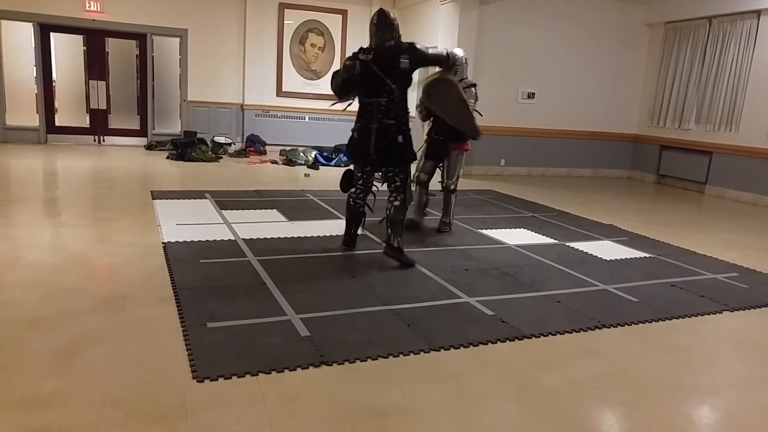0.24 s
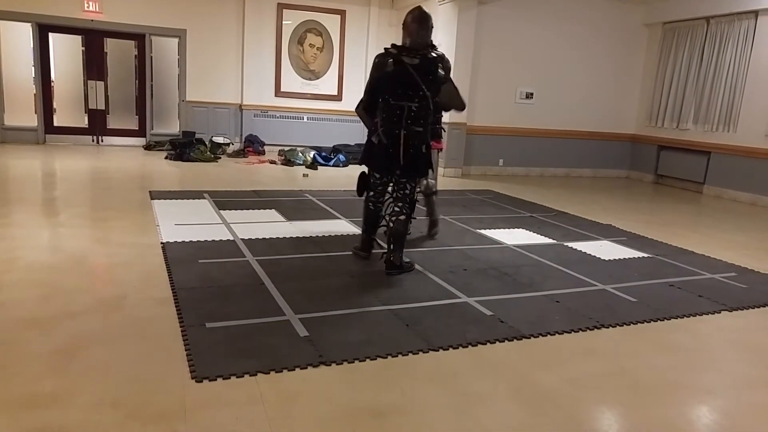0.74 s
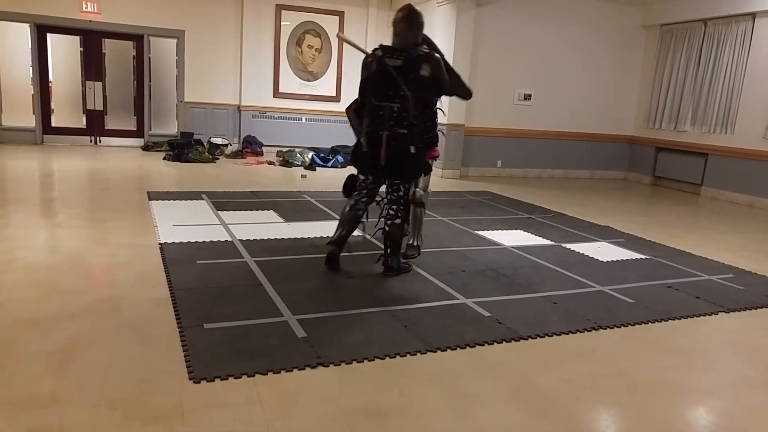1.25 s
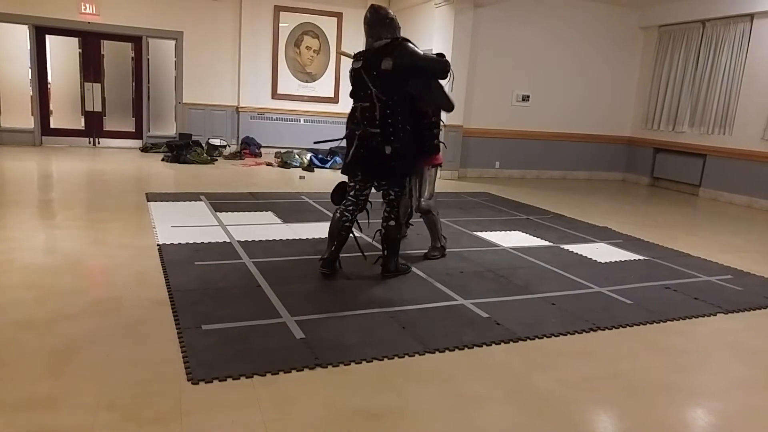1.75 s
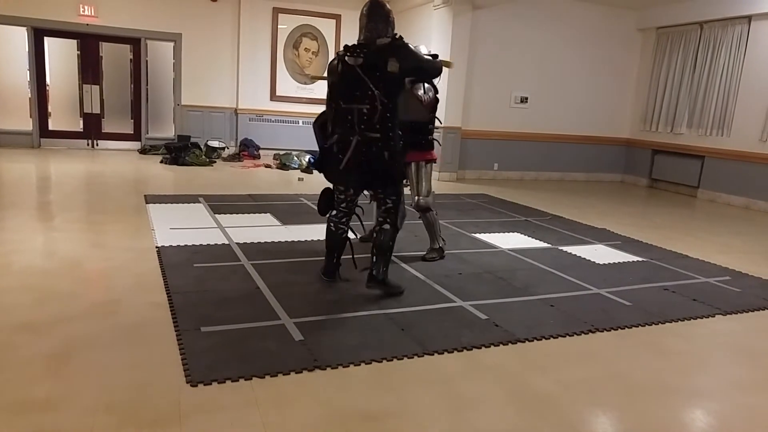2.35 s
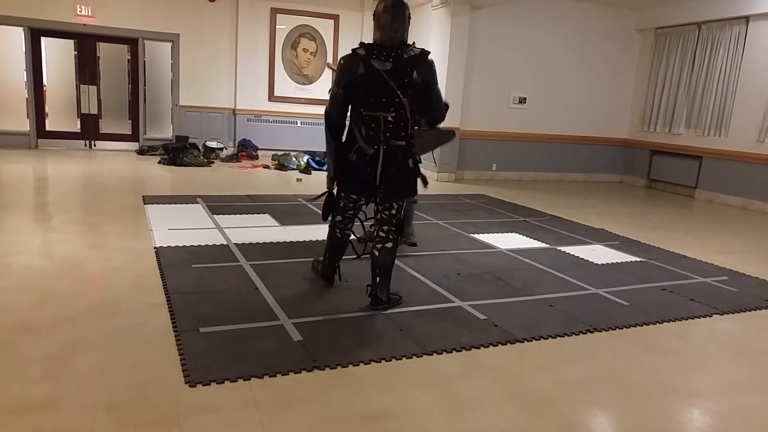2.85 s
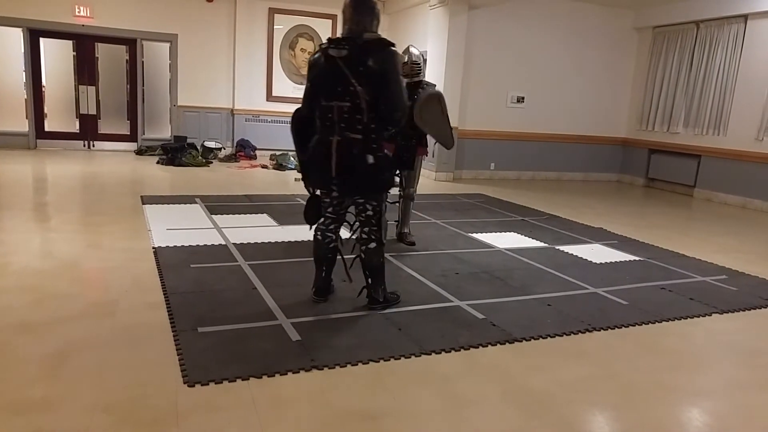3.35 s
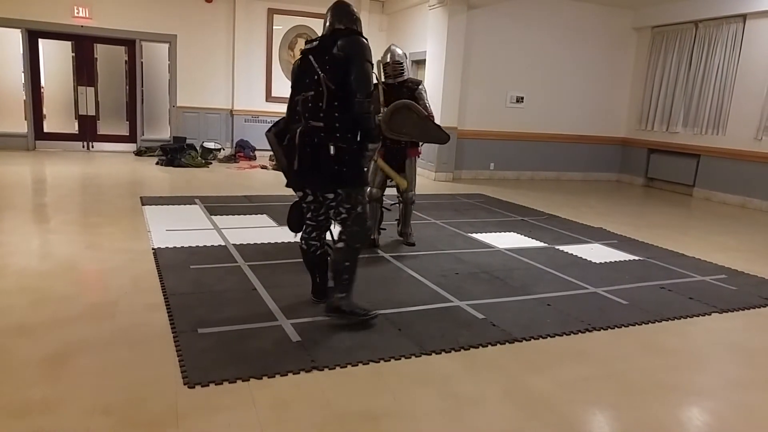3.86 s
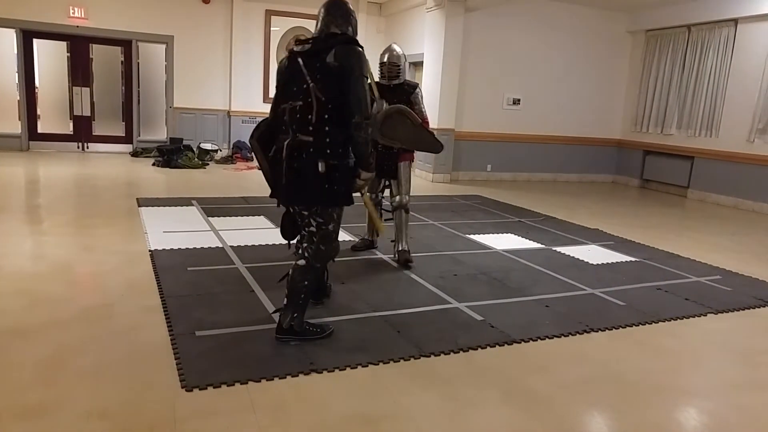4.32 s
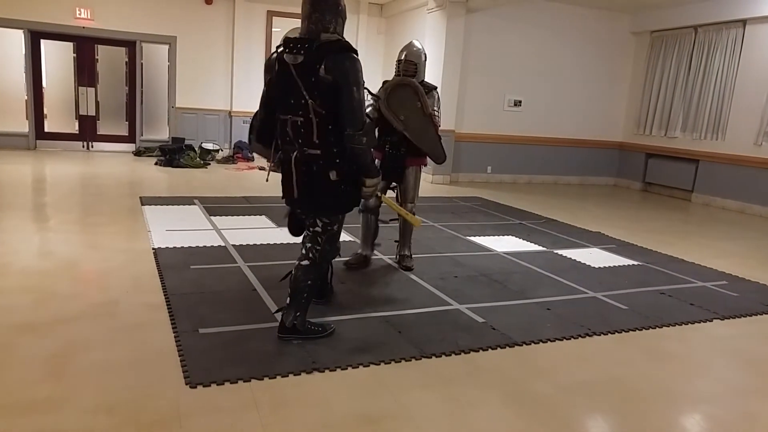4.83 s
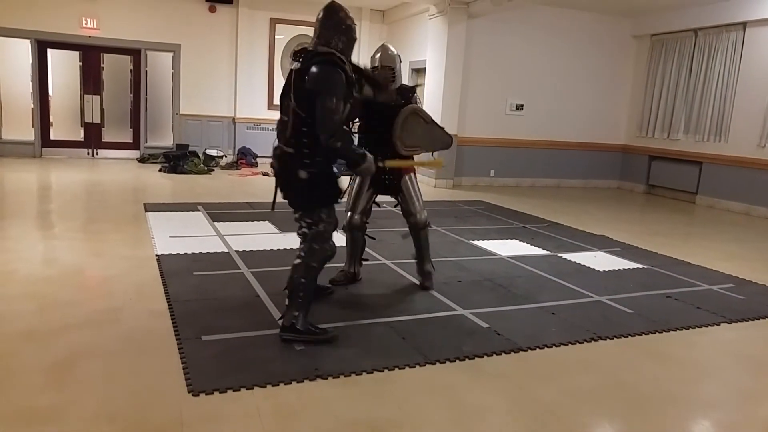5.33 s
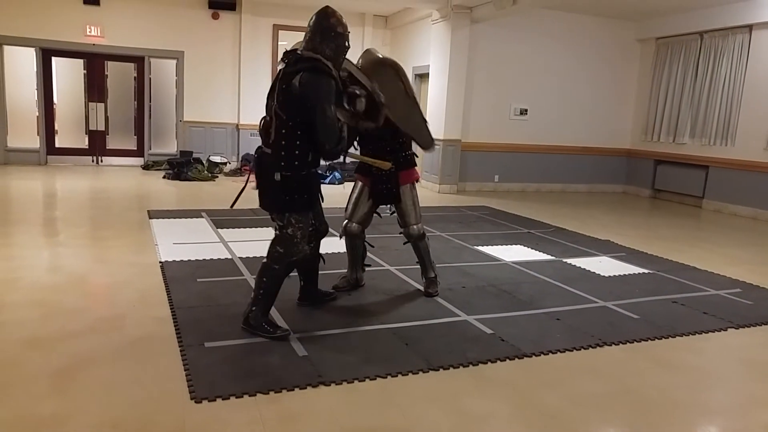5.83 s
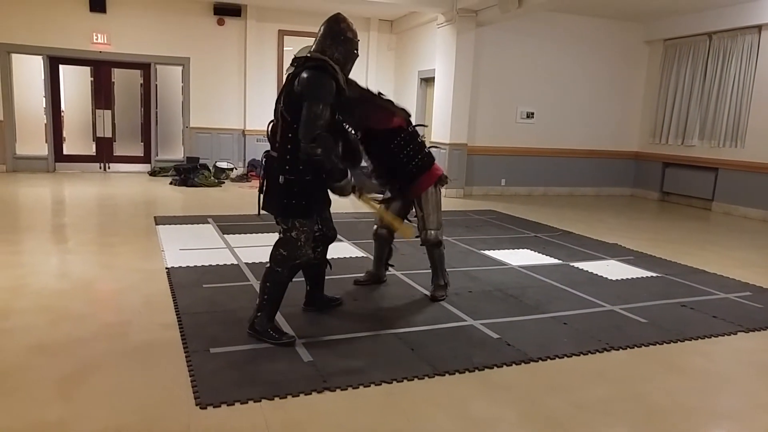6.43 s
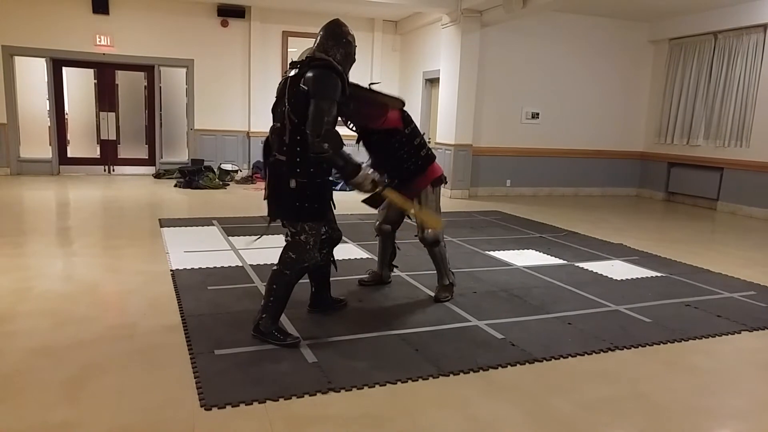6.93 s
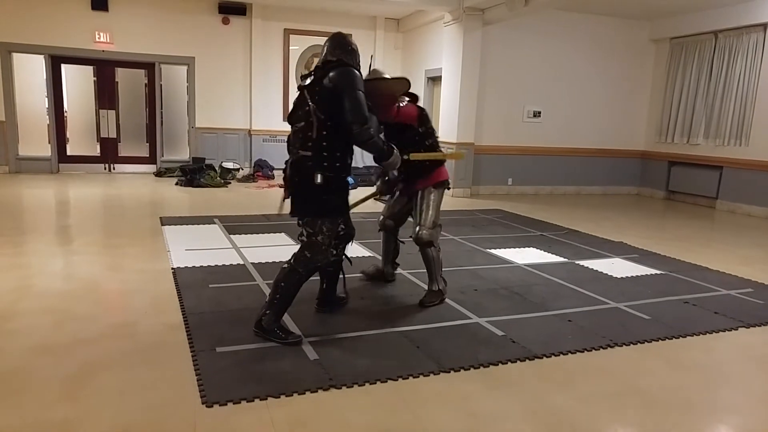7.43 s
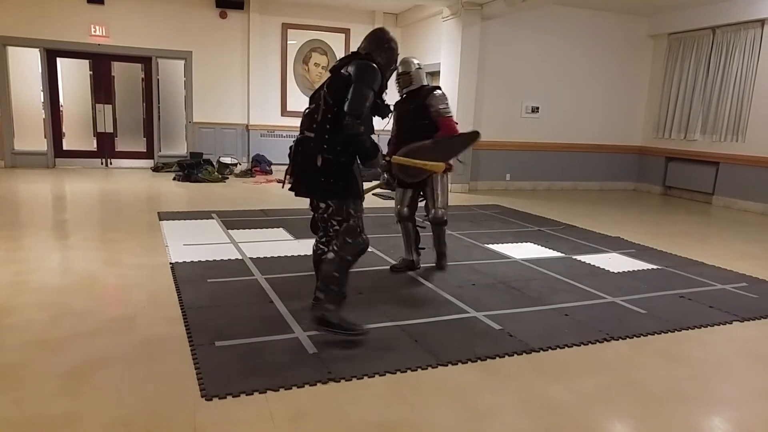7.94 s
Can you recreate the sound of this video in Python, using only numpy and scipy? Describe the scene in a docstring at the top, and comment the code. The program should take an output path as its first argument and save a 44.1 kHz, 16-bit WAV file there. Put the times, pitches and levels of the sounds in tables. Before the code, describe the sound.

In a bare, echoing hall, two fighters in plate armour trade blows with batons and a shield. Sharp steel clanks and dull thuds come in quick irregular clusters over jingling plates, leather rustle and footfalls. A huge smash lands early, then a quieter lull, then denser clashing and two more heavy smashes. A fixed stereo microphone overloads slightly on the hardest hits.

```python
"""Armoured sparring in an echoing hall

Two fighters in plate spar with batons and a shield: clanks, thuds and smashes are dying bursts of noise
with a few clear rings. Loose plates, leather and feet rattle as random touches on short resonances.
A helmet, three clear plates, a scrape, stamps and low thumps are ringing modes or sines. Decaying stereo
noise echoes nearly all of it; two microphone ports colour the sound and overload on the hardest blows."""
import sys
import numpy as np
from scipy import signal
from scipy.fft import rfft, irfft, next_fast_len
from scipy.io import wavfile
from scipy.ndimage import uniform_filter1d

SR = 44100
rng = np.random.default_rng(int(sys.argv[2]) if len(sys.argv) > 2 else 0)


def log_audio(samples):
    """Write samples as a 16-bit WAV file to the path given in sys.argv[1]."""
    # one column per channel
    frames = np.atleast_2d(samples).T
    # limit to full scale, then quantise
    limited = np.clip(frames, -1, 1)
    pcm = np.round(limited * 32767).astype(np.int16)
    wavfile.write(sys.argv[1], SR, pcm)


N = 360738
GRAIN = 8192   # samples in one blow

# Plate strikes plate. Each row: start in seconds, level in dB, strongest ring in Hz, decay constant in
# seconds, low end (big plates) in dB, build-up constant in seconds, how far the ring stands out in dB.
PLATE_CLANKS = [(0.1565, -28, 6800, 0.012, -17, .001, 5), (0.2406, -3.5, 8520, 0.0065, 7.5, 0.00067, 1.5),
                (0.2932, -11, 5260, 0.014, 1, .003, 10), (0.3127, -17.5, 4960, 0.72, -11, .002, 2),
                (0.6506, -14.5, 9200, 0.045, -25, 0.0029, 6), (0.761, -3, 3900, 0.018, 13.5, .008, 4),
                (0.803, -11, 4300, .015, 6, 0.0033, 3), (0.955, -12.5, 4100, 0.1, 7, 0.0035, 1),
                (1.031, -3.5, 5040, 0.011, 2, 0.0043, -3), (1.056, -10.5, 6600, 0.022, -18, 0.0017, 3),
                (1.1739, -14, 6620, 0.013, 9, .002, 1), (1.43, -6.5, 6800, .012, 0, 0.0018, 3),
                (1.458, -16, 4900, .0082, -16, 0.00081, 1), (1.494, -12.5, 9500, 0.082, -16, .003, 0),
                (1.539, -5.5, 8000, 0.011, 9, 0.0013, -2), (1.549, -14, 6500, 0.017, -1, 0.0009, 11),
                (1.7575, -14.5, 7940, 0.018, -3, 0.0018, -1), (1.8898, -10.5, 6040, 0.021, 10, 0.0016, 7),
                (2.0098, -7.5, 6370, 0.016, 4.5, 0.00085, 3.5), (2.0585, -15, 6000, .048, 2, 0.0024, 2),
                (2.198, -0.5, 5120, 0.0051, 5, 0.00088, 5), (2.66, -10, 6600, 0.013, 0, 0.00092, 4),
                (2.7134, -15, 6540, 0.028, 2, 0.0018, 4), (2.931, -18.5, 5820, 0.026, -5, 0.0035, 0),
                (2.969, -13.5, 8600, 0.0075, 7, 0.0019, 5), (2.98, -22, 6060, 0.11, 5.5, .004, 0),
                (3.157, -9.5, 6600, 0.024, 4, 0.002, 2), (3.268, -12, 5000, 0.015, 5.5, 0.0017, 5),
                (3.279, -16, 6030, 0.045, 1, 0.004, 1), (3.5994, -20.5, 10000, 0.06, 4, .003, 7),
                (4.021, -24.5, 5060, 0.012, -15, 0.0017, -3), (4.107, -17, 8760, .004, -8, .001, 8),
                (4.132, -18.5, 6250, .008, -8, .001, -2), (4.149, -21, 6540, .006, -16, .002, -1),
                (4.156, -19, 5400, .004, -20, .001, 3), (4.228, -14.5, 9200, 0.012, 3, 0.0076, 0),
                (4.27, -12, 5470, 0.014, 2, .003, 4), (4.2792, -14, 5470, 0.016, 0, .004, 5),
                (4.331, -29, 8700, .008, 3, .003, 4), (4.573, -22, 8300, 0.015, 8, .002, 3),
                (4.6044, -18.5, 5250, 0.034, 4, .001, -2), (4.6743, -21.5, 7350, 0.024, -7, .002, 2),
                (4.7321, -13, 4560, .022, 0, .001, 5.5), (4.8, -22, 6100, 0.013, 0, .002, 1),
                (5.158, -22.5, 6000, .01, 5, .002, -4), (5.182, -6.5, 9070, 0.0085, 2, .0015, 3.5),
                (5.245, -7.5, 8300, 0.015, 9, 0.0033, 3), (5.2939, -4.5, 8800, 0.026, 0, 0.0027, 8),
                (5.3702, -9.5, 8640, 0.014, -23, 0.0031, 2), (5.402, -10, 7000, 0.04, -8, .003, -1),
                (5.473, -2.5, 9270, 0.0066, 1.5, 0.0018, 5), (5.6093, -13, 5100, 0.017, 2, 0.0029, 1),
                (5.654, -11, 8900, 0.028, 7, .005, 3), (5.694, -6, 5060, 0.021, 6.5, .006, 4),
                (5.7813, -0.5, 8900, 0.0039, -25, 0.00046, 11), (5.8232, -9.5, 8900, .004, -27, 0.0018, 1),
                (5.851, -10, 8800, 0.011, -15, .008, -1), (5.997, -14.5, 8300, 0.0037, -3, 0.0012, 3),
                (6.031, -5, 8740, 0.013, 4, 0.0051, 5.5), (6.088, -7, 6380, 0.0068, -13, 0.0021, 1),
                (6.259, -10.5, 8560, 0.0085, 0, 0.0042, 1), (6.293, -14, 4930, 0.0067, 9, .001, 3),
                (6.305, -14.5, 5000, 0.016, 8, 0.00091, 9), (6.355, -6, 8650, .004, 4.5, .001, -9),
                (6.365, -8.5, 7150, 0.0033, -6, 0.00078, 3), (6.372, -12, 4500, 0.12, 5.5, 0.0049, 2),
                (6.394, -14, 5900, 0.0069, 8, 0.0025, 15), (6.4194, -12, 5500, 0.0049, 3, .002, 6),
                (7.0565, -25.5, 4820, 0.016, -13, .002, -1), (7.103, -20, 4830, 0.059, 6, 0.0026, 3),
                (7.198, -4, 5950, 0.0066, -17, .002, 7), (7.707, -20, 7170, 0.0051, -9, .001, 4),
                (7.7337, -15, 8500, 0.0085, 5, .003, 4), (7.754, -23, 6000, 0.0068, -6, .002, 1),
                (7.821, -5, 6020, .004, -3, 0.0025, 2), (7.83, -12.5, 8900, 0.028, -10, .002, -1),
                (7.95, -10, 5900, 0.047, 1.5, 0.0013, 4)]
# Full-force blows that shake a whole suit. Each row: as for clanks, then low thump in dB.
SUIT_SMASHES = [(2.1451, 8.4, 8480, 0.021, 2.5, 0.00033, 0.9, 12.5),
                (6.4981, 4.2, 9050, 0.05, 3, .0006, 0.83, 7), (7.1429, 9.1, 8370, 0.02, -2, .0004, 3.6, 2)]
# Armour shifting as the fighters move. Each row: time in seconds, small plates in dB, leather and feet in dB.
GEAR_MOVING = [(0.0, -27.5, -32.5), (0.41, -32, -24.5), (0.7, -22.5, -38), (0.98, -25.5, -33),
               (1.25, -32, -43), (1.5, -21.5, -21.5), (1.9, -31, -40), (2.499, -32.5, -57),
               (3.1, -36.5, -41), (3.401, -40.5, -49.5), (3.95, -48.5, -49.5), (4.249, -32, -43),
               (4.45, -56, -46), (4.75, -35, -51), (5.05, -43, -47), (5.3, -21.5, -38), (5.58, -28.5, -41),
               (5.9, -30, -32), (6.3, -29.5, -37.5), (6.9, -47, -49), (7.35, -22, -30), (7.6, -27.5, -43),
               (7.8, -41, -63), (8.18, -30.5, -46)]


def from_db(db):
    """Decibels to gain."""
    return 10 ** (np.asarray(db) / 20)


def rms_one(x):
    """Scaled to unit rms."""
    return x / np.sqrt(np.mean(x ** 2) + 1e-20)


def at_hz(points, hz):
    """A table of (Hz, value) read on a log axis."""
    points = np.array(points)
    return np.interp(np.log(hz + 1), np.log(points[:, 0]), points[:, 1])


def ring(clicks, hz, t60_s):
    """Two-pole resonance: a unit click starts a dying sine of height 1."""
    radius = from_db(-60 / (t60_s * SR))
    w = 2 * np.pi * hz / SR
    return signal.lfilter([0, np.sin(w)], [1, -2 * radius * np.cos(w), radius ** 2], clicks + 1e-18)


def causal(db):
    """Minimum-phase response for gains on an rfft grid, by folding the cepstrum."""
    cepstrum = irfft(db * np.log(10) / 20)
    half = len(cepstrum) // 2
    cepstrum[1:half] *= 2
    cepstrum[half + 1:] = 0
    return np.exp(rfft(cepstrum))


def add_grain(out, start_s, grain):
    """Mix one grain into the last axis of out."""
    at = int(start_s * SR)
    out[..., at:at + GRAIN] += grain


def diffuse(size, gain_of_band):
    """Diffuse field: half-octave bands of stereo noise, left-right likeness and gain set per band."""
    # Each row: frequency in Hz, left-right likeness (1 = same).
    likeness = [(30, .2), (60, 1), (125, 0.99), (250, 0.95), (600, 0.74), (1200, 0.018), (3000, 0.01),
                (12000, 0.047)]
    out = 0
    edges_hz = 25 * 2 ** np.arange(0, 9.6, .5)
    white = rng.standard_normal((2, 2, size))   # two mid-side pairs, so neighbouring bands differ
    for k, (low_hz, high_hz) in enumerate(zip(edges_hz, edges_hz[1:])):
        band = signal.butter(2, [low_hz, high_hz], "band", fs=SR, output="sos")
        mid, side = signal.sosfilt(band, white[k % 2])
        hz = np.sqrt(low_hz * high_hz)
        alike = np.clip(at_hz(likeness, hz), -1, 1)
        stereo = np.sqrt(1 + alike) * mid + np.sqrt(1 - alike) * side * [[1], [-1]]
        out = out + gain_of_band(hz) * stereo
    return out


def hall_air():
    """Steady hum of the hall: diffuse noise coloured by band."""
    # Each row: frequency in Hz, relative level in dB.
    colour = [(18, -41), (30, 22), (337, -5), (497, -34), (612, 10.5), (2030, -1), (8920, -2), (15000, -7)]
    rms_db = -37
    return from_db(rms_db) * rms_one(diffuse(N, lambda hz: from_db(at_hz(colour, hz))))


def hall(x):
    """Echo: noise tails that build up fast and die by band, redrawn as the fighters shift place."""
    # Each row: frequency in Hz, time to fall 60 dB in seconds (before the early boost).
    t60_table = [(80, 0.52), (135, 0.86), (230, 0.62), (560, 1.51), (1470, 3.35), (3880, 1.47),
                 (10200, 0.54)]
    hall_db, build_s, places = -2, 0.00035, 12
    early_db, early_s = 7.5, 0.1   # near walls and floor answer first
    t = np.arange(3 * SR // 2) / SR
    out = np.zeros((2, N + 2 * SR))
    shape = (1 - np.exp(-t / build_s)) * from_db(early_db * np.exp(-t / early_s))
    step = N // places + 1
    for at in range(0, N, step):
        tail = shape * diffuse(len(t), lambda hz: from_db(-60 * t / at_hz(t60_table, hz)))
        tail /= np.sqrt(np.sum(tail ** 2) / 2)
        echo = signal.fftconvolve(x[None, at:at + step], tail, axes=1)
        out[:, at:at + echo.shape[1]] += echo[:, :N + 2 * SR - at]
    return from_db(hall_db) * out[:, :N]


def rattle(level_db, lo_hz, hi_hz, per_s, cycles, spread_db):
    """Small random touches dealt to 30 resonances, each falling 60 dB in the given cycles."""
    sizes = from_db(spread_db * np.minimum(rng.exponential(1, N), 3.0)) * rng.choice([-1, 1], N)
    touches = sizes * (rng.random(N) < per_s / SR)
    dealt = rng.integers(0, 30, N)
    pitches_hz = np.geomspace(lo_hz, hi_hz, 30)
    total = sum(ring(touches * (dealt == k), hz, cycles / hz) for k, hz in enumerate(pitches_hz))
    return from_db(level_db) * rms_one(total)


def shaken(moving_db, hits, offset_db, settle_s):
    """Level in dB of loose gear: the fighters' movement, plus a shake that settles after each hit."""
    power = np.zeros(N)
    for s, db, *_ in hits:
        power[int(s * SR)] += from_db(2 * (db + offset_db))
    settling = signal.lfilter([1], [1, -np.exp(-2 / (settle_s * SR))], power)
    return 10 * np.log10(from_db(2 * moving_db) + settling)


def loose_plates():
    """Jingle of small plates, shaken by movement and clanks; rows: left, right, into the hall."""
    s, plates_db, _ = np.transpose(GEAR_MOVING)
    moving_db = np.interp(np.arange(N) / SR, s, plates_db)
    level_db = shaken(moving_db, PLATE_CLANKS + SUIT_SMASHES, offset_db=-23, settle_s=0.036)
    jingle = rattle(level_db, lo_hz=1375, hi_hz=16040, per_s=1700., cycles=70, spread_db=4.0)
    # the jingle comes from farther off, so less arrives straight
    return from_db([[-3], [-3], [0]]) * jingle


def leather_and_feet(thud_table):
    """Shuffle: heavily damped low touches, shaken by movement and thuds."""
    s, _, feet_db = np.transpose(GEAR_MOVING)
    moving_db = np.interp(np.arange(N) / SR, s, feet_db)
    level_db = shaken(moving_db, thud_table, offset_db=-23.5, settle_s=0.15)
    return rattle(level_db, lo_hz=196.0, hi_hz=1550, per_s=270.0, cycles=2.96, spread_db=4.5)


def blows(table, corners_hz, edge_db, t60_s, width, clear_db, touches_per_s, first, count):
    """Each blow is a dying burst of uneven touches; rows: straight left, straight right, into the hall."""
    out, t = np.zeros((3, N + GRAIN)), np.arange(GRAIN) / SR
    f = np.fft.rfftfreq(GRAIN, 1 / SR) + 1
    for s, level_db, hz, dies_s, low_db, builds_s, focus_db, high_db, hall_db in table:
        dies_s = max(dies_s, .001)
        swell = 1 - np.exp(-t / max(builds_s, 1 / SR))
        corners_db = [low_db + edge_db, low_db, 0, 0, high_db, high_db + edge_db]
        focus = focus_db * np.exp(-(np.log(f / hz) / width) ** 2)
        colour = causal(at_hz(list(zip(corners_hz, corners_db)), f) + focus)
        # every touch wakes other overlapping modes, which die as noise
        touches = rng.exponential(1, GRAIN) * (rng.random(GRAIN) < touches_per_s / SR)
        touches[int(builds_s * SR)] = first
        decay = from_db(-60 / (t60_s * SR))
        envelope = signal.lfilter([1], [1, -decay], touches * swell * np.exp(-t / dies_s))
        dense = rfft(rng.standard_normal(GRAIN) * envelope)
        # a few modes near the ring stand clear
        modes_hz = hz * np.exp(np.append(0, rng.normal(0, 1, count)) * width)
        sines = np.sin(2 * np.pi * np.outer(t, modes_hz)).sum(1)
        clear = rfft(from_db(clear_db) * sines * swell * np.exp(-t / np.minimum(2.15 * dies_s, 0.023)))
        straight = irfft((dense + clear) * colour)
        # summed over all directions the chance dips and peaks of the burst even out
        even = dense / np.abs(dense) * np.sqrt(np.sum(irfft(dense) ** 2))
        spread = irfft((even + .5 * clear) * colour) * np.exp(-t / (7.3 * dies_s + t60_s))
        right = np.roll(straight, rng.integers(1, 5))   # each blow comes from its own direction
        onset = straight[:int((builds_s + dies_s + .005) * SR)]
        gain = from_db(level_db) / (3 * np.sqrt(np.mean(onset ** 2)))
        add_grain(out, s, gain * np.array([straight, right, from_db(hall_db) * spread]))
    return out[:, :N]


def thuds(thud_table):
    """Soft contacts: low, quickly damped bursts with a boom below and a crack above."""
    rows = []
    for s, level_db, hz, boom_db, crack_db, hall_db in thud_table:
        dies_s, builds_s, focus_db = 0.0095, .0008, 2.5
        rows.append((s, level_db, hz, dies_s, boom_db, builds_s, focus_db, crack_db, hall_db))
    return blows(rows, corners_hz=[50, 320, 550, 950, 1700, 6000], edge_db=-20.0, t60_s=0.023,
                 width=0.34, clear_db=-22.5, touches_per_s=270.0, first=2.78, count=1)


def clanks_and_smashes():
    """Steel on steel: bright bursts; small, high-ringing plates have the brighter top end."""
    rows = []
    for row in PLATE_CLANKS + [smash[:-1] for smash in SUIT_SMASHES]:
        high_db = -5.5 + 3 * np.log2(row[2] / 6500)   # 3 dB per octave of ring
        rows.append((*row, high_db, 0))
    return blows(rows, corners_hz=[500, 2500, 4800, 9500, 12500, 20000], edge_db=-7.0, t60_s=0.012,
                 width=0.22, clear_db=-12.5, touches_per_s=2600., first=3.9, count=8)


def helmet():
    """A glancing blow, its bounce and the baton's grind ring the helmet, each mode by touches of its own."""
    # Each row: mode in Hz, relative level in dB, time to fall 60 dB in seconds.
    modes = [(3130, 1, .06), (3165, -6, .15), (3215, -3, .17), (3270, 0, .07), (3520, -2, .08),
             (3620, -4, .07), (3800, -4, .06), (3985, -11, .25), (4010, -6, .35), (4110, -4, .07),
             (4320, -5, .07), (4500, -3, .08), (4650, -6, .06)]
    blow_s, grind_s, bounce_s, touch_s = .7605, .09, .042, .016
    level_db, grind_db, bounce_db = -27.5, -18, -3.5
    out, t = np.zeros(N), np.arange(N) / SR - blow_s
    force = from_db(grind_db) * (t > 0) * (t < grind_s)
    for after_s, db in (0, 0), (bounce_s, bounce_db):
        force = force + from_db(db) * np.sin(np.pi * np.clip((t - after_s) / touch_s, 0, 1))
    for hz, db, t60_s in modes:
        hits = force * rng.standard_normal(N) * (rng.random(N) < 2200. / SR)
        out += from_db(level_db + db) * ring(hits, hz, t60_s)
    return out


def stamps():
    """The floor booms briefly under each stamp: a dying low sine."""
    # Each row: start in seconds, level in dB, boom in Hz.
    stamp_table = [(0.957, -22, 149), (1.55, -15.5, 84), (2.3, -18, 131), (5.838, -39, 152),
                   (6.098, -15, 111), (7.295, -19.5, 136)]
    decay_s = 0.021
    out, t = np.zeros(N + GRAIN), np.arange(GRAIN) / SR
    for s, db, hz in stamp_table:
        add_grain(out, s, from_db(db) * np.sin(2 * np.pi * hz * t) * np.exp(-t / decay_s))
    return out[:N]


def thumps():
    """A dying low sine with each full-force blow, stronger on the right."""
    thump_hz, decay_s, left_db = 44.4, 0.035, -9
    out, t = np.zeros(N + GRAIN), np.arange(GRAIN) / SR
    for s, *_, thump_db in SUIT_SMASHES:
        add_grain(out, s, from_db(thump_db) * np.sin(2 * np.pi * thump_hz * t) * np.exp(-t / decay_s))
    return out[:N] * from_db([[left_db], [0]])


def clear_plates():
    """Three plates ring clear of the rattle: a close pair of dying sines per mode, so that it beats a little."""
    # Modes, each row: frequency in Hz, relative level in dB, time to fall 60 dB in seconds.
    # Hits, each row: start in seconds, level in dB, loudest ring in Hz.
    broad_modes = [(1440, 0, .1), (2300, -7, .03), (2660, 0, .04), (3010, -6, .04), (3550, -4, .05),
                   (4530, -5, .06), (5070, -6, .05), (5870, -3, .04), (6430, -9, .05)]
    broad_hits = [(4.279, -26, 4500), (4.732, -21, 4700), (5.183, -11, 2900), (5.473, -11, 2600),
                  (7.147, -15, 1440), (7.822, -21, 3010)]
    narrow_modes = [(1710, 5, .1), (2750, -5, .16), (3450, -2, .06), (3780, -5, .05), (4230, -8, .06),
                    (5490, 0, .08)]
    narrow_hits = [(4.607, -23, 3300), (5.25, -17, 5490), (5.698, -25, 1710), (7.15, -8, 2750),
                   (7.843, -19, 3450)]
    small_modes = [(3350, -2, .2), (4750, -4, .08), (5250, -3, .07), (6920, -2, .09)]
    small_hits = [(5.253, -20, 5250), (5.314, -14, 3350), (5.405, -14, 6920), (5.72, -20, 4750)]
    uneven_db, loss_db_per_octave = 2, -12   # each blow lands elsewhere on the plate
    out, t = np.zeros(N + GRAIN), np.arange(GRAIN) / SR
    swell = 1 - np.exp(-t / 0.0005)   # the plate takes the blow
    for modes, hits in (broad_modes, broad_hits), (narrow_modes, narrow_hits), (small_modes, small_hits):
        for s, hit_db, loudest_hz in hits:
            for hz, mode_db, t60_s in modes:
                partner_hz = hz * rng.uniform(1.005, 1.02)
                pair = np.sin(2 * np.pi * hz * t) + 0.25 * np.sin(2 * np.pi * partner_hz * t)
                spot_db = uneven_db * rng.normal() + loss_db_per_octave * abs(np.log2(hz / loudest_hz))
                add_grain(out, s, from_db(hit_db + mode_db + spot_db - 60 * t / t60_s) * pair * swell)
    return out[:N]


def scrape():
    """An edge slides along a plate: a rough sine that rises in pitch."""
    start_s, lasts_s, level_db, start_hz, rise_hz = 4.656, .06, -33, 1900, 150
    along = np.clip((np.arange(N) / SR - start_s) / lasts_s, 0, 1)
    rough = 1 + 1.1 * rms_one(uniform_filter1d(rng.standard_normal(N), size=150))
    phase = 2 * np.pi * np.cumsum(start_hz + rise_hz * along) / SR
    return from_db(level_db) * np.abs(np.sin(np.pi * along)) * rough * np.sin(phase)


def scene():
    """Blows and rattle, heard straight and through the hall, with thumps and air added."""
    # Baton on shield or padding, heavy steps. Each row: start in seconds, level in dB, strongest ring in Hz,
    # deep boom in dB, sharp crack in dB, extra into the hall in dB.
    thud_table = [(0.041, -19, 755, -14, -7, 7.5), (0.311, 3, 657, 8, -2, 5), (0.732, 2.5, 838, 8, -4, 2),
                  (0.763, -9.5, 340, 2, 6, -5), (1.03, -0.5, 425, 2, -12, 4.5),
                  (1.423, 5, 816, 6.5, -6.5, 2.5), (1.4935, 2, 813, -22, -13, -4),
                  (2.008, -15.5, 825, -20, -15, 6), (2.146, -3.5, 294, 9.5, -26, 6),
                  (2.657, -5.5, 815, 2.5, -5.5, 2.5), (2.666, -15, 290, 9, -4, 11),
                  (2.712, -10, 790, -12, -7, -5), (3.158, -12.5, 691, -25, 2.5, 7.5),
                  (3.613, -19.5, 363, 4, -8, 2), (4.1076, -17, 910, -7, -4, 0.5),
                  (4.132, -16.5, 1190, 3, 1, 8.5), (4.776, -19.5, 786, -23, 0, 3),
                  (5.3, 1, 443, 17, 3, -2.5), (5.325, -3.5, 335, 15, -10, -8),
                  (5.654, -15, 924, -20, -9, 2), (6.062, -13.5, 652, 9.5, -3, 9.5),
                  (6.5, 6.5, 407, 9, -0.5, 1.5), (7.143, 4, 850, 1, -6.5, 3.5),
                  (7.6975, -11.5, 902, -44, -4, -4), (7.821, -17, 824, -32, -5, -4),
                  (7.952, -9.5, 259, 3.5, 10, 2)]
    air = hall_air()
    # rows: left, right, into the hall
    steel = loose_plates() + clanks_and_smashes() + helmet() + clear_plates() + scrape()
    feet = leather_and_feet(thud_table) + stamps()
    soft = thuds(thud_table) + from_db([[0], [0], [5.5]]) * feet   # feet and leather fill the hall more
    return steel[:2] + soft[:2] + hall(steel[2] + soft[2]) + thumps() + air


def record(dry):
    """Port colour and lag, a lopsided overload that thumps on the hardest blows, the top cut."""
    # Each row: frequency in Hz, port gain in dB.
    left_port = [(30, -16.5), (120, -12), (330, -8.5), (430, -12), (515, -10.5), (610, -7.5), (750, -3.5),
                 (1400, -14.5), (2500, -11.5), (4800, -3), (6000, -9), (7300, -1), (7850, -3.5),
                 (8300, 4.5), (9000, -1.5), (11000, -3), (14000, -11), (15700, -33.5)]
    right_port = [(30, -40), (120, -10), (330, -9), (430, -9), (515, -20), (610, -6), (750, -5.5),
                  (1400, -14), (2500, -12), (4800, 0.5), (6000, 4.5), (7200, 1.5), (7800, -6.5), (8500, 2),
                  (9100, 5), (10200, -5), (12500, -17), (15700, -23.5)]
    right_lag_s, gain_db, top, lopsided, cutoff_hz = 1e-5, 3.5, 0.93, 0.034, 15790
    size = 2 * next_fast_len(N // 2 + 2048)
    hz = np.fft.rfftfreq(size, 1 / SR)
    left = causal(at_hz(left_port, hz))
    right = causal(at_hz(right_port, hz)) * np.exp(-2j * np.pi * hz * right_lag_s)
    x = irfft(rfft(dry, size) * from_db(gain_db) * [left, right], size)[:, :N]
    x = x / (1 + np.abs(x / top) ** 20.0) ** (1 / 10.1)   # peaks beyond the top fold back
    x = x + lopsided * from_db([[-8], [0]]) * x ** 4   # even power: loud blows push one way
    x = signal.sosfilt(signal.butter(1, 25., "high", fs=SR, output="sos"), x)
    x = signal.sosfilt(signal.ellip(10, .5, 40, cutoff_hz, fs=SR, output="sos"), x)
    return np.clip(x, -1, 1)


dry = scene()
out = record(dry)
log_audio(out)
```